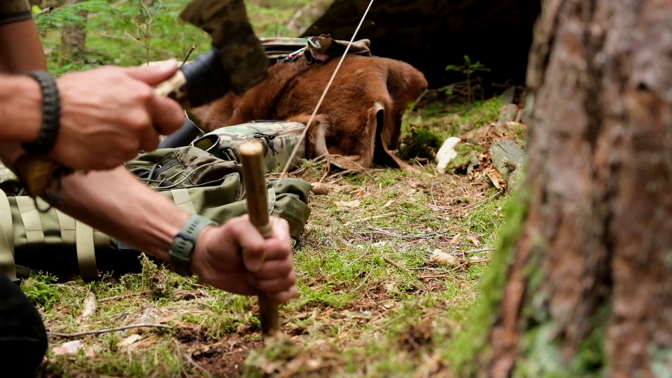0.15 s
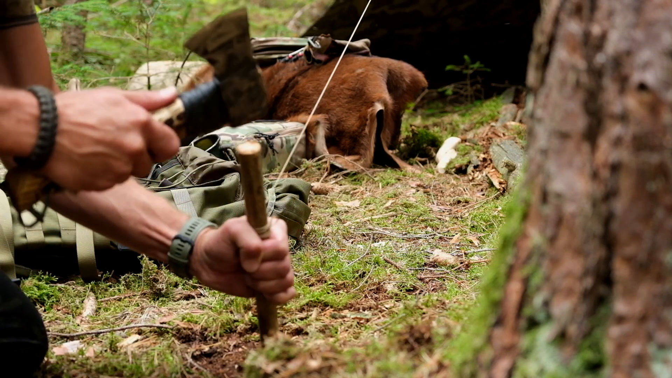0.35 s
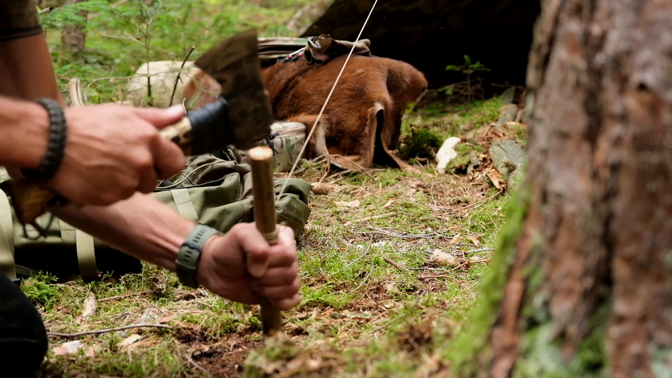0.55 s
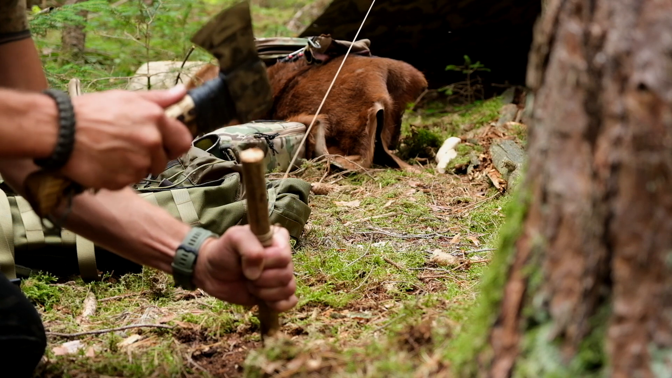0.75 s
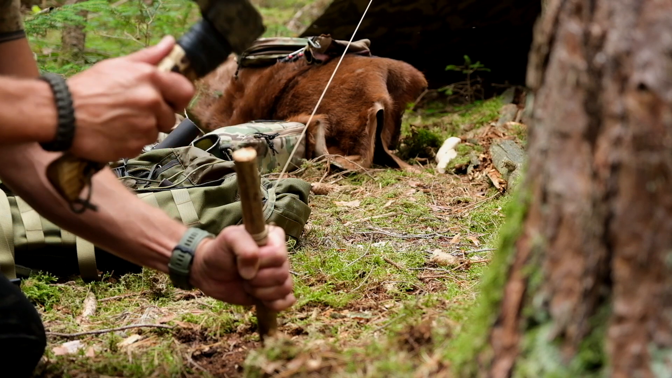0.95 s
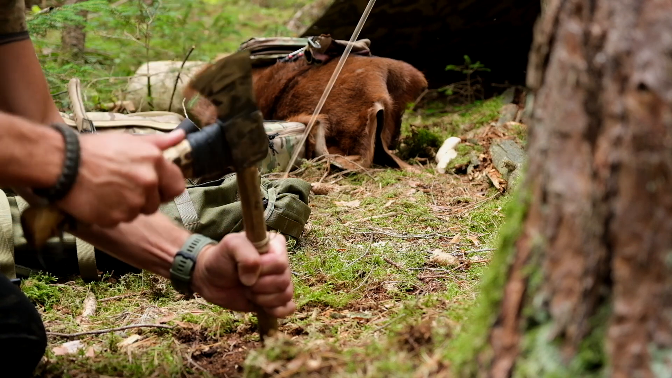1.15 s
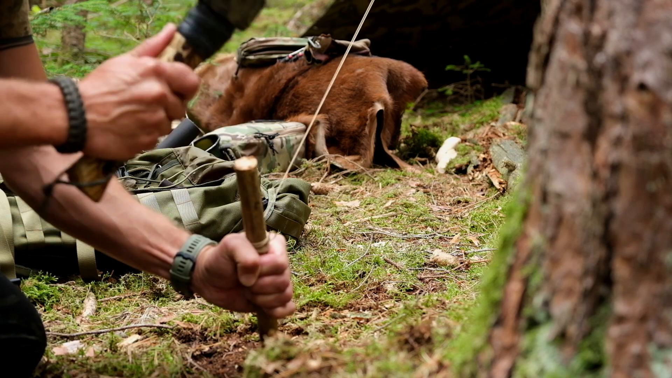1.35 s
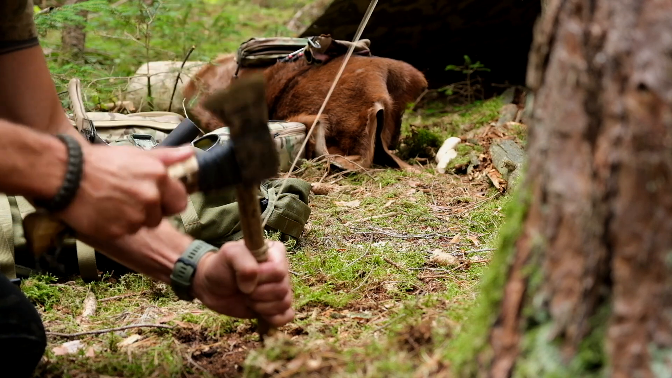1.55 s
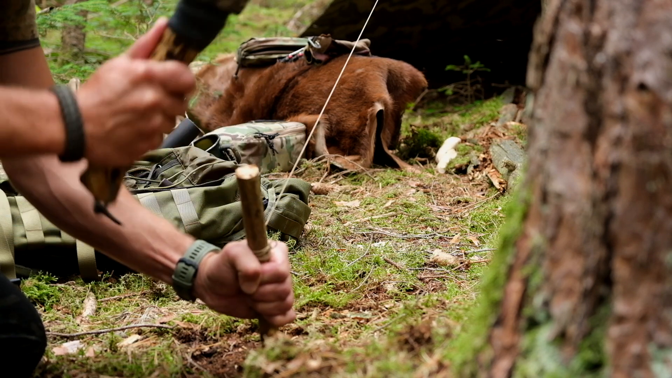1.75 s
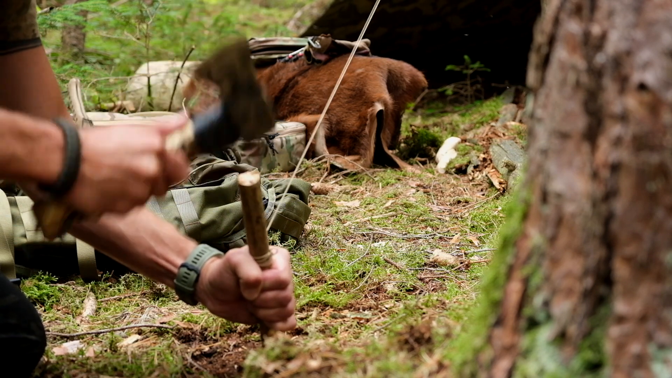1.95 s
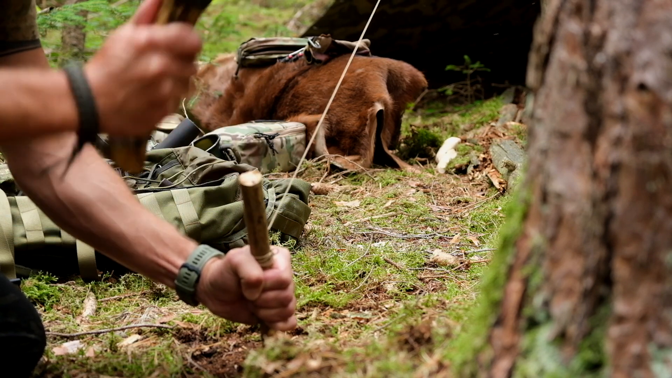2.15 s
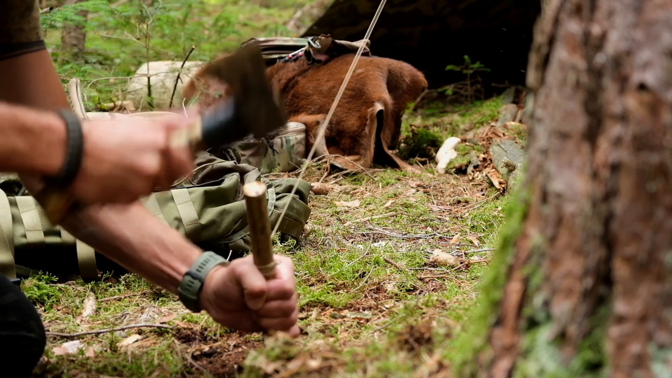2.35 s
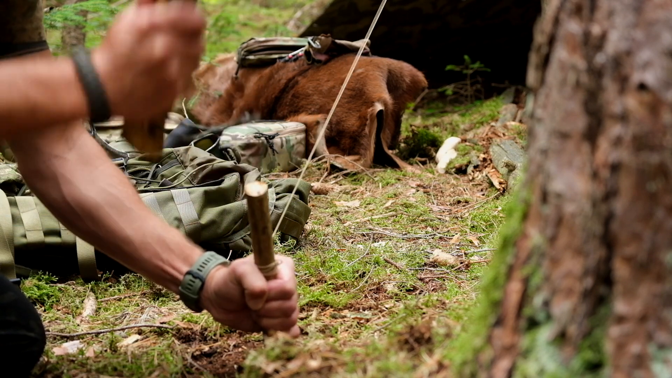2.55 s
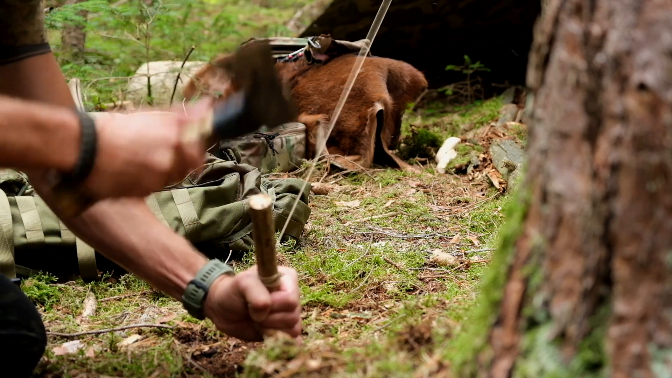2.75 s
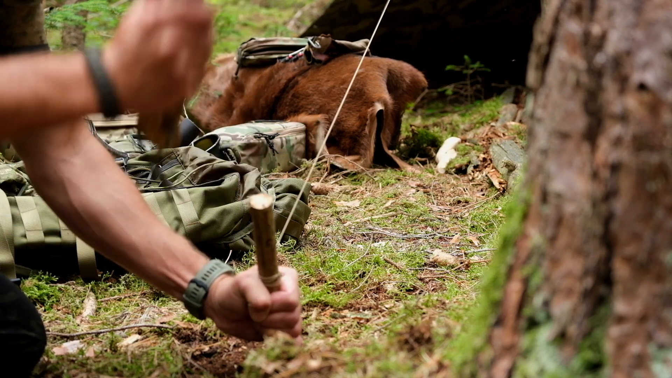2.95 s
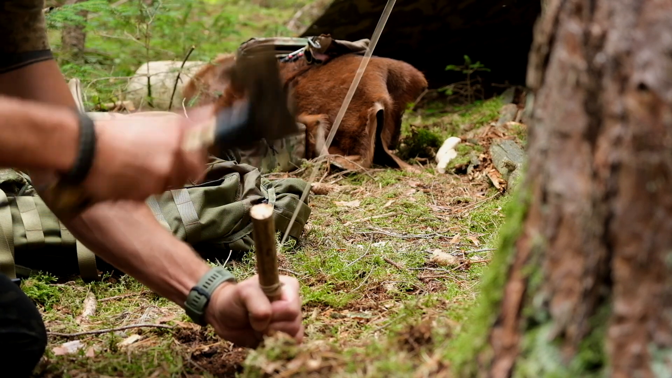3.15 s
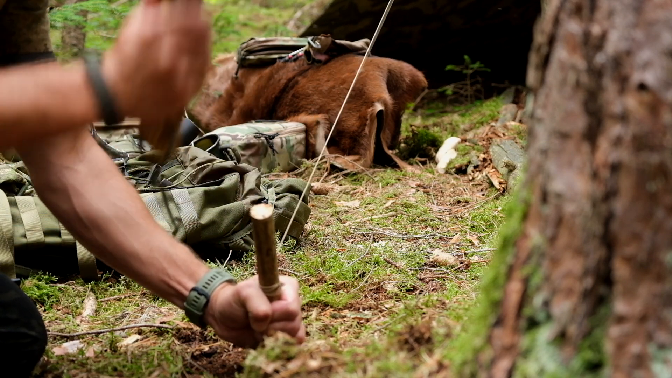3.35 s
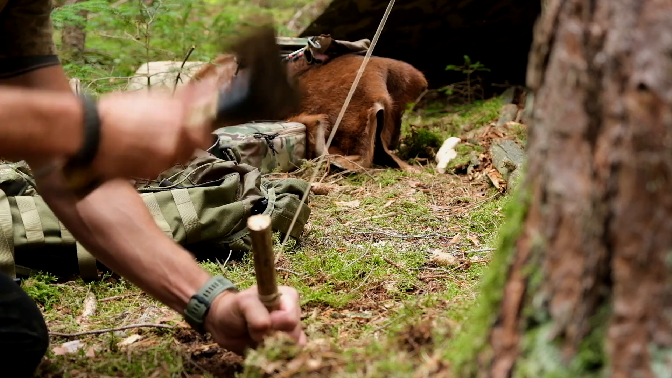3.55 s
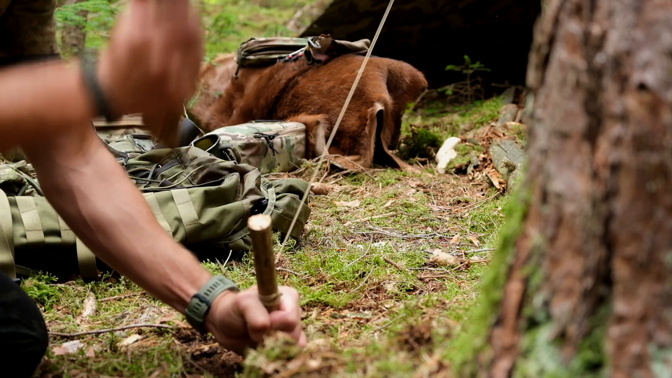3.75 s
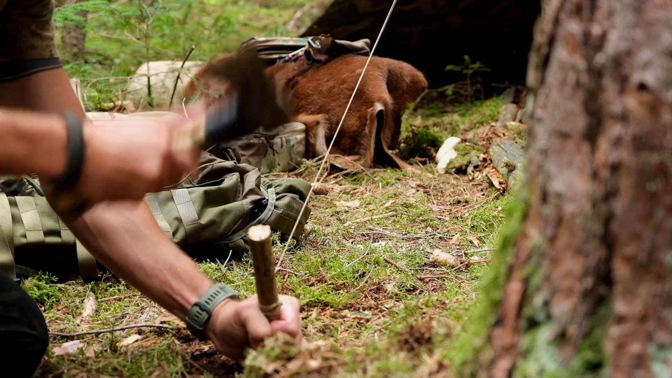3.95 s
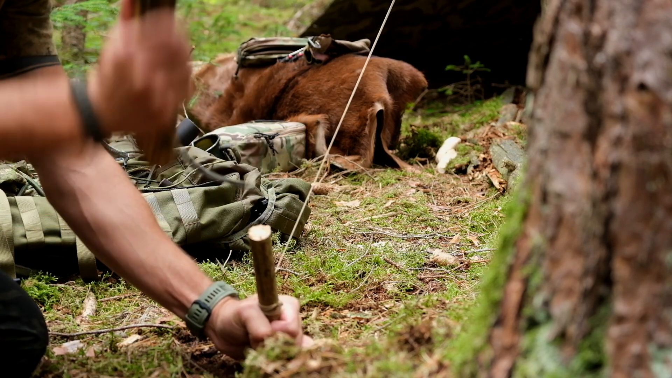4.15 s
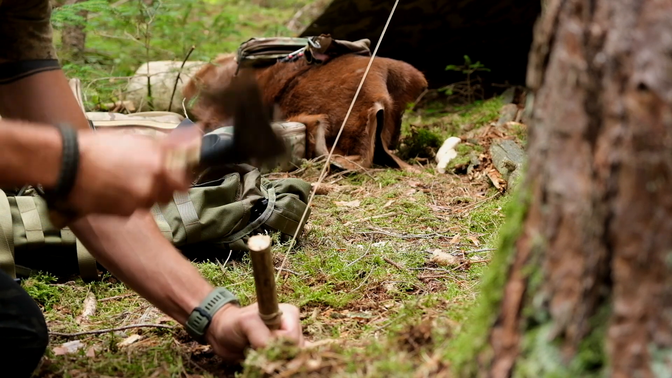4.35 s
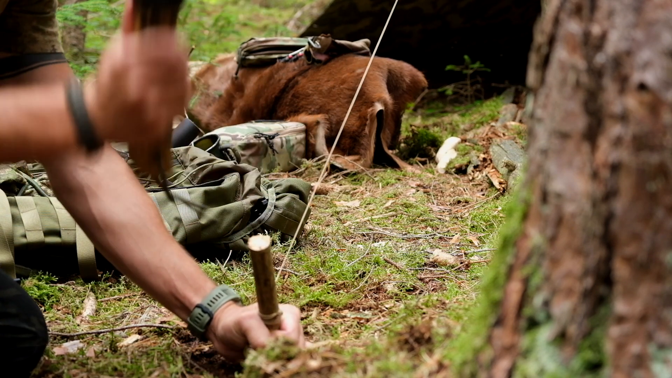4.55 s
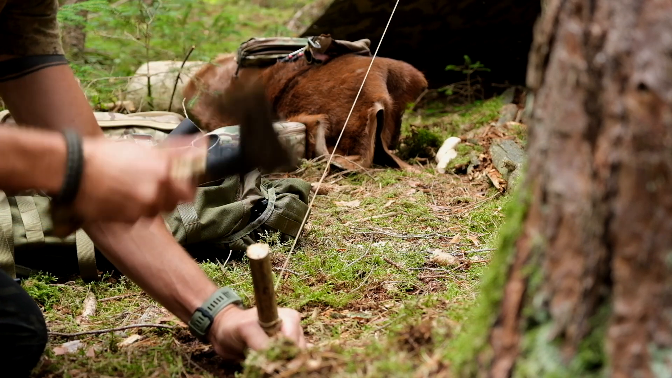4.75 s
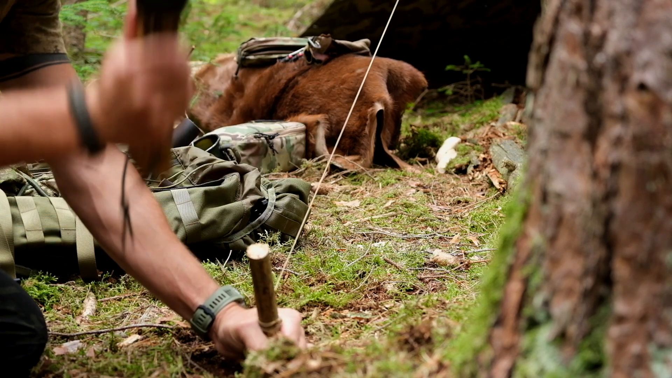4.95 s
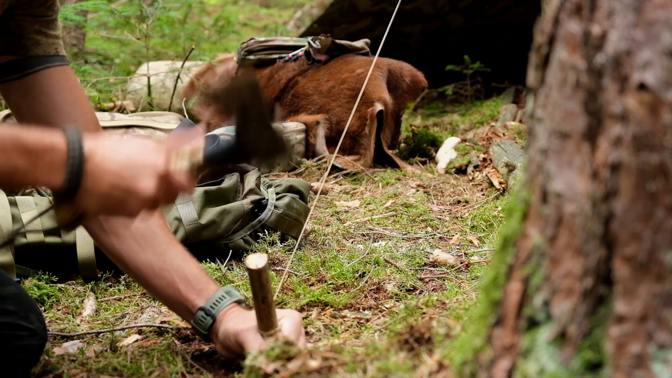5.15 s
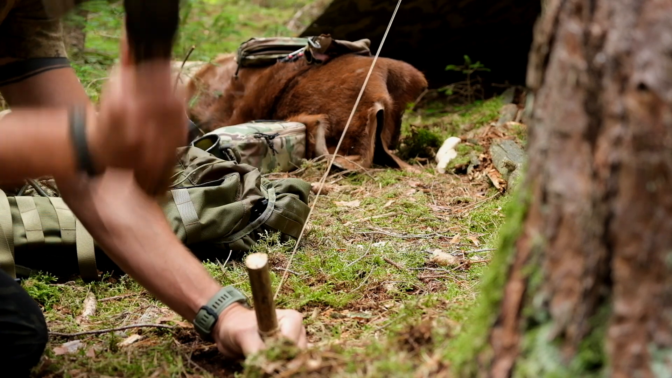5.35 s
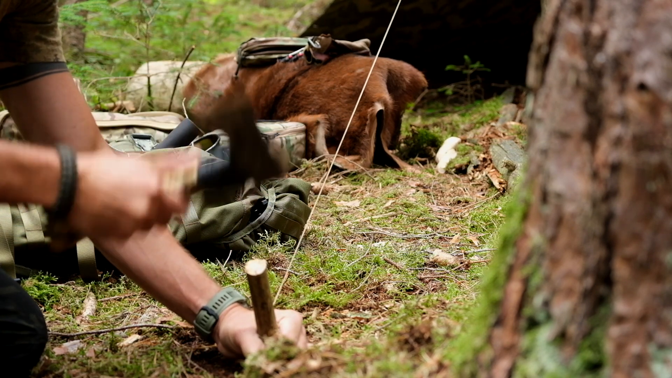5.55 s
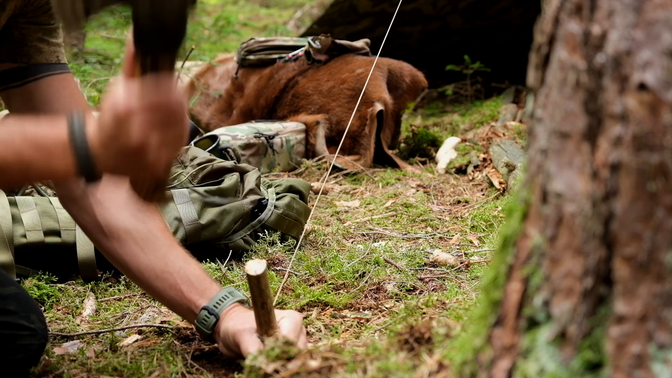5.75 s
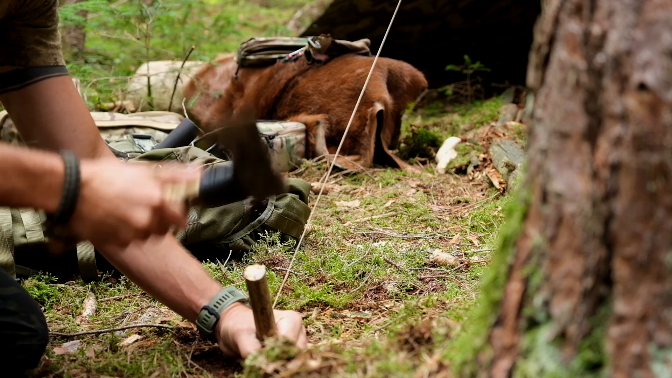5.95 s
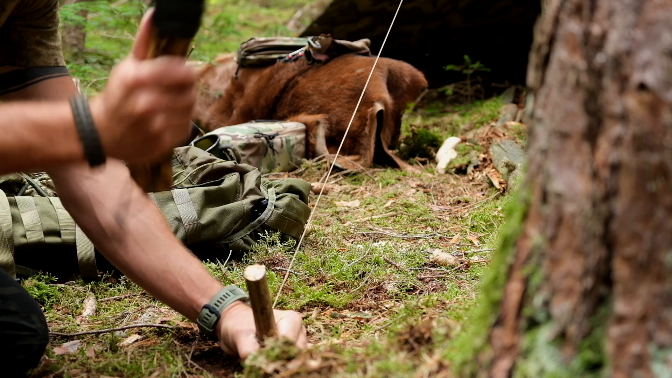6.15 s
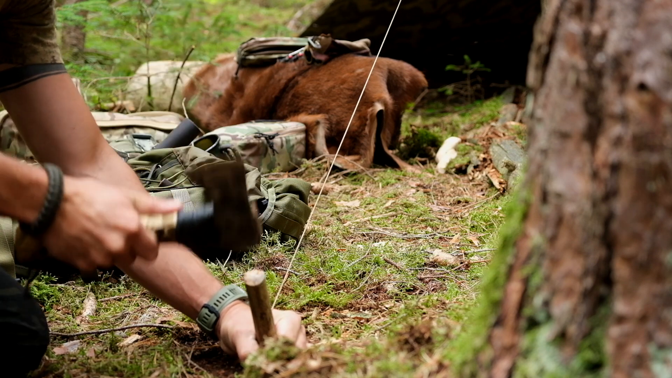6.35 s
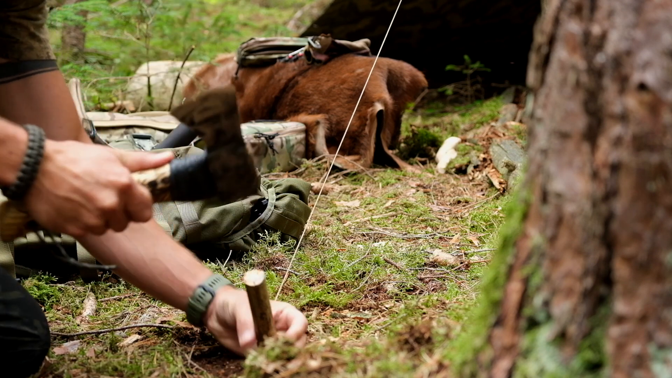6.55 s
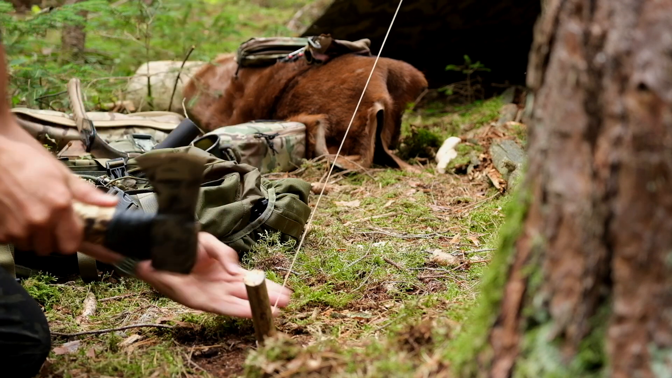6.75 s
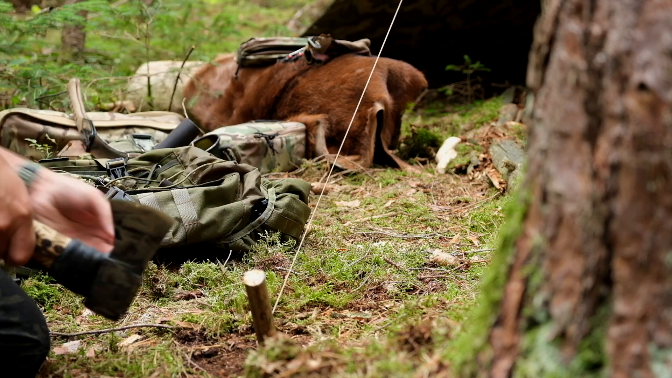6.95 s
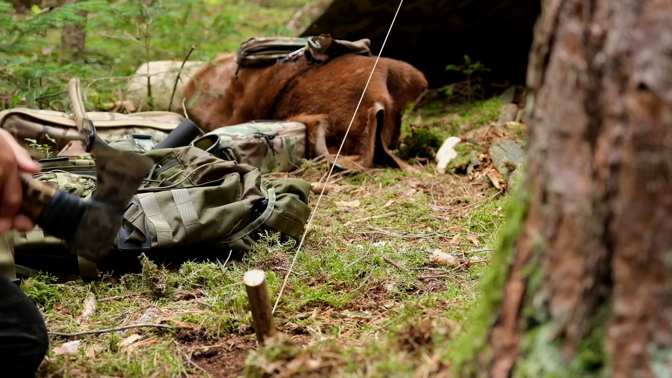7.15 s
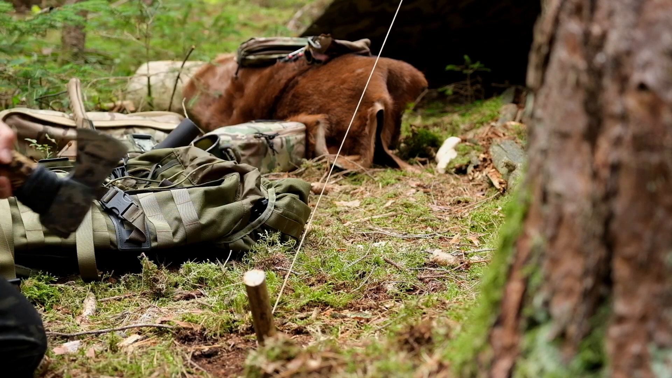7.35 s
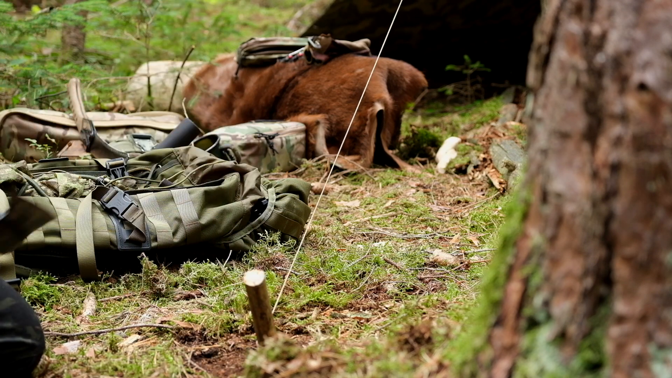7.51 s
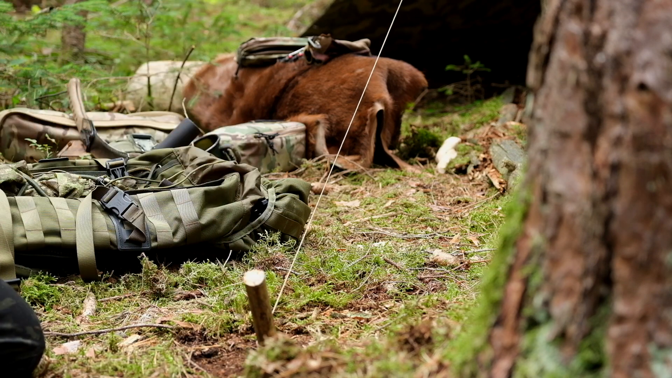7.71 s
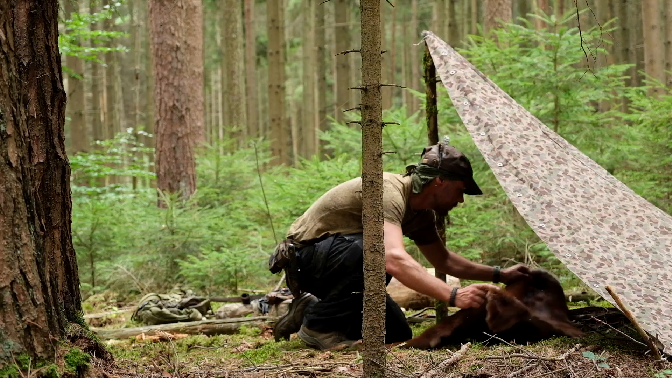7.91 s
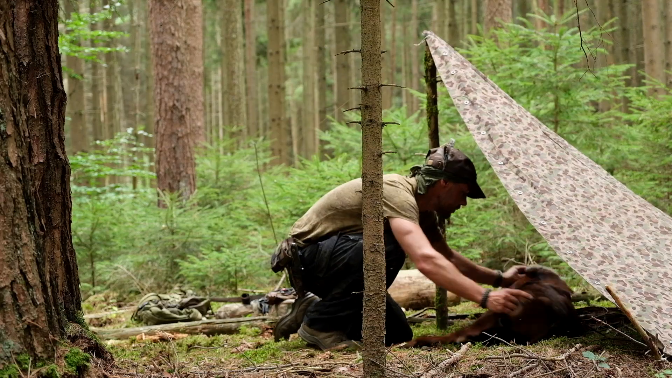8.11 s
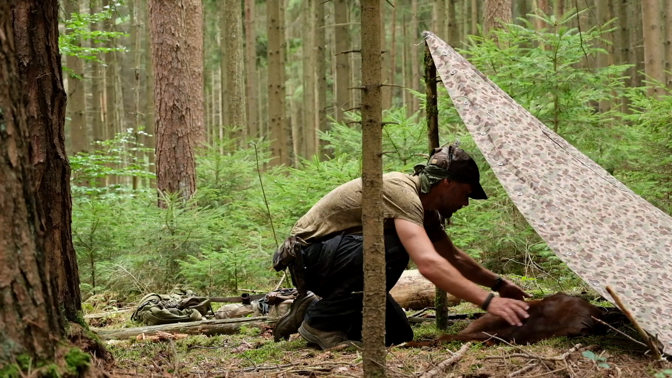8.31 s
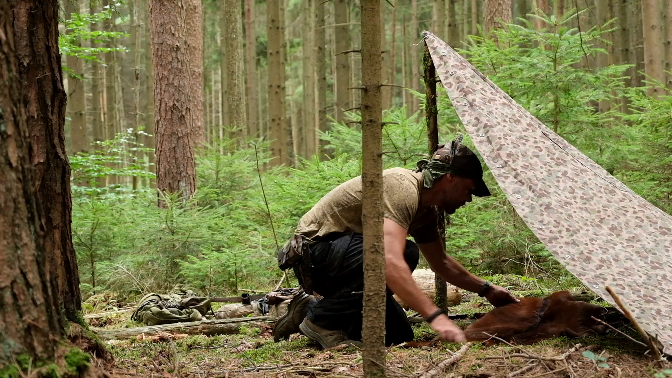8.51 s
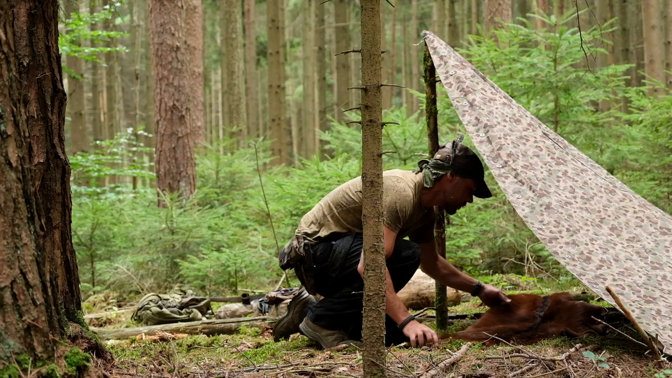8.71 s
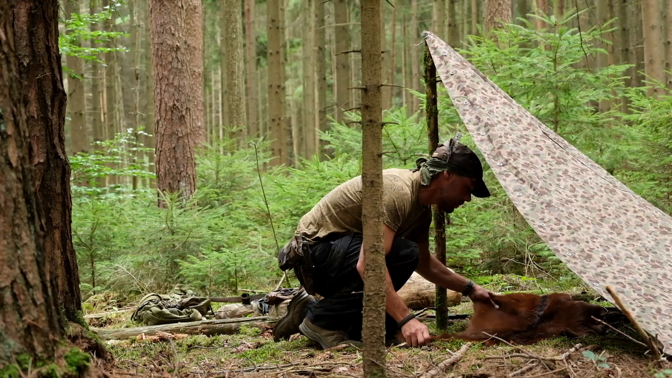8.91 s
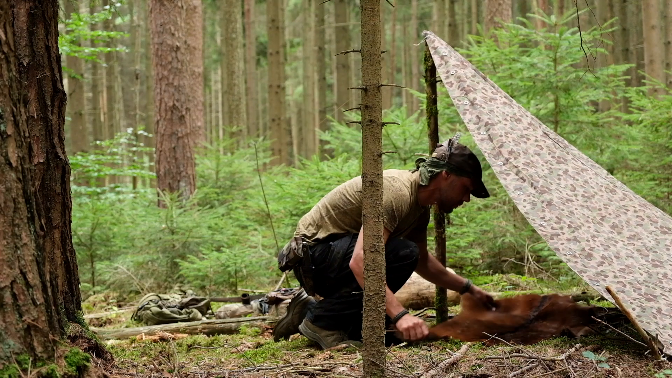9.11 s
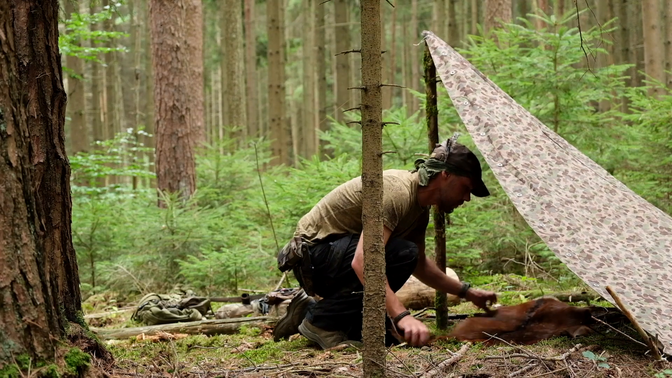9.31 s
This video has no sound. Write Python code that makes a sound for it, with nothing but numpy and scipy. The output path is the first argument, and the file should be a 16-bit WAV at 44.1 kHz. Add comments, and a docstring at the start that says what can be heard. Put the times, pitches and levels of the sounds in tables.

```python
"""In a wood, far birds sing over a faint hush, heard by a stereo microphone close to a wooden stake. From 1.2 s
the back of a hatchet drives the stake into the soil: the first blows find it loose and wobbling, the later ones
gripped. Each is a noise burst ringing stake and steel, with a soil thud that sinks in pitch; the sharp front of
each knock echoes off the trunks; the hard blows overload the input. After 6.4 s the hammering is over and
birds, rustles and low bumps remain; at 7.7 s a distant rush, a soft band of noise, sets in and stays to the
end."""
import sys
import numpy as np
from scipy import signal
from scipy.io import wavfile
from scipy.ndimage import uniform_filter1d

SR = 44100
rng = np.random.default_rng(int(sys.argv[2]) if len(sys.argv) > 2 else 0)


def waveform_to_disk(signal):
    """Save audio, clipped to [-1, 1], as 16-bit WAV at the path in sys.argv[1]."""
    frames = np.transpose(np.atleast_2d(signal))
    scaled = np.clip(frames, -1, 1) * 32767
    samples = np.round(scaled).astype(np.int16)
    wavfile.write(sys.argv[1], SR, samples)


N = 413658  # samples, about 9.4 s

# Hush of the wood, relative spectrum: pitch_hz, density_db (per Hz)
HUSH = [(15, -34), (25, 3), (70, 0), (123, -10.5), (223, -5.5), (394, -14.5), (451, -16.5), (1650, -21),
        (2480, -21), (4250, -13), (4870, -16.5), (8830, -24.5), (14800, -29.5), (16000, -37)]
# How alike the hush is left and right: pitch_hz, likeness (1 = same)
LIKENESS = [(60, 0.98), (180, 1), (550, 0.83), (1650, 0.65), (4970, 0.96), (15000, 0.09)]
# Far birds blurred together, level over time: time_s, level_db
CHORUS = [(0.0, -59.5), (1.38, -69.5), (1.77, -59), (2.04, -64.5), (4.18, -56.5), (4.39, -62.5),
          (6.4, -59.5), (7.5, -65), (7.86, -55), (8.18, -64.5), (9.38, -63)]
# Bird notes that stand out: start_s, length_s, start_hz, end_hz, level_db, bird
NOTES = [(0., .06, 5200, 5010, -53, "far high"), (0.149, 0.16, 2576, 2417, -56.5, "low"),
         (.219, .028, 5320, 5080, -52, "warbler"), (.234, 0.091, 4640, 3360, -50.5, "far warbler"),
         (0.28, 0.13, 3450, 2760, -50, "warbler"), (0.36, 0.03, 7680, 7900, -56.5, "far high"),
         (0.451, 0.065, 4560, 4830, -56, "warbler"), (0.748, 0.095, 5180, 4800, -55, "far warbler"),
         (0.928, 0.089, 4650, 4900, -54, "warbler"), (1.034, 0.032, 4770, 4580, -53.5, "warbler"),
         (1.765, 0.037, 5100, 5180, -52, "high"), (1.81, 0.029, 4770, 6700, -51.5, "far warbler"),
         (1.824, 0.05, 3840, 4560, -47.5, "warbler"), (1.848, 0.086, 3980, 2970, -56, "far warbler"),
         (2.516, 0.05, 6140, 5260, -56.5, "high"), (2.843, 0.046, 6840, 6270, -54.5, "high"),
         (2.863, .045, 4870, 5100, -54.5, "far high"), (2.922, 0.1, 5970, 4820, -57, "far high"),
         (4.038, 0.025, 4500, 5600, -44, "far warbler"), (4.043, 0.092, 4590, 3630, -48, "far warbler"),
         (4.241, .017, 6400, 5850, -56, "high"), (4.847, 0.063, 7660, 8050, -56, "high"),
         (4.956, 0.045, 5820, 6210, -44, "warbler"), (5.384, 0.083, 4270, 5220, -52, "far high"),
         (5.611, 0.033, 4160, 6200, -54.5, "high"), (5.643, .06, 2820, 3030, -52, "far warbler"),
         (5.785, .053, 5740, 5270, -50.5, "high"), (6.05, .086, 3300, 2750, -56, "low"),
         (6.224, 0.11, 2550, 2586, -62, "low"), (6.413, 0.066, 4570, 4480, -50.5, "far high"),
         (6.511, 0.02, 4400, 4170, -47.5, "warbler"), (6.522, 0.05, 3540, 3260, -50.5, "warbler"),
         (6.569, 0.049, 2810, 3255, -55.5, "warbler"), (7.069, .044, 6070, 6570, -56.5, "high"),
         (7.136, 0.074, 5170, 5330, -54, "high"), (7.2, .076, 5610, 5270, -52, "far high"),
         (7.275, .041, 2210, 1956, -61, "low"), (7.589, .067, 5000, 5000, -55, "far high"),
         (7.713, .1, 4800, 3620, -53.5, "far warbler"), (7.867, 0.097, 3600, 2960, -56, "far warbler"),
         (8.552, .06, 5120, 4660, -49.5, "far high"), (8.672, 0.031, 4170, 4310, -48.5, "warbler"),
         (8.698, 0.024, 3430, 3140, -44.5, "warbler"), (8.7, 0.041, 8100, 7670, -57, "far high"),
         (8.733, 0.045, 2890, 3300, -47.5, "warbler"), (8.919, 0.079, 6650, 5700, -49, "high"),
         (8.988, .07, 5400, 4590, -56.5, "high"), (9.126, .06, 6260, 5000, -60, "far high"),
         (9.18, .075, 4700, 4600, -56, "high"), (9.192, .095, 2510, 2420, -64.5, "low"),
         (9.299, 0.021, 4500, 5680, -49, "high"), (9.308, 0.023, 5650, 4780, -47.5, "high"),
         (9.312, 0.073, 3370, 2950, -61, "low")]
# Where each bird sits, by bird: blur_hz (from distance), left_right_db (positive = left)
PERCHES = {"low": (34, 6), "warbler": (110, -5), "far warbler": (410, -5.5), "high": (75, 7),
           "far high": (280, 12)}
# Small ticks and plops near by: start_s, peak_db, centre_hz
TICKS = [(0.049, -25, 6200), (.22, -42, 8000), (4.544, -47.5, 660), (5.029, -46, 1700), (5.442, -30, 4400),
         (6.523, -50, 673)]
# Low bumps: centre_s, level_db, direction (1 = push, -1 = pull)
BUMPS = [(8.017, -39, -1), (8.036, -35, 1), (8.115, -37.5, -1), (8.789, -38, 1)]
# Brief treble rustles: centre_s, spread_s, level_db
RUSTLES = [(6.6, 0.034, -56.5), (7.3, 0.055, -63)]
# Ringing of the wood around: pitch_hz, t60_s
WOOD_T60 = [(200, .12), (800, 0.12), (2000, 0.7), (4000, 0.44), (8000, 0.3), (14000, .1)]
# Scatter off what lies near: pitch_hz, t60_s
LITTER_T60 = [(1000, 0.026), (3000, 0.1), (8000, 0.14), (14000, 0.036)]
# Colour of both scatter tails: pitch_hz, level_db
ECHO_COLOUR = [(500, -32), (1300, -4.5), (2000, -5), (3200, -4), (5000, -3), (6500, -3.5), (8500, 1.5),
               (14000, -14)]
# Single echoes off trunks and the ground: delay_s, level_db
ECHOES = [(.0079, -24.5), (0.0163, -16), (0.0206, -27), (.024, -33), (0.034, -37), (.0505, -32.5),
          (.066, -41)]
# Blows of the hatchet: start_s, knock_peak_db (before overload), brightness_db (per octave), thud_db,
# thud_hz (nominal)
BLOWS = [(1.189, -0.5, 1, -33, 243), (1.544, 1.5, 0.5, -24.5, 190), (1.92, 7, -3, -17, 213),
         (2.314, 12, 1, -16.5, 258.9), (2.71, 11, 5, -13.5, 244), (3.108, 13, 1, -12.5, 264),
         (3.501, 11, 3, -12, 260), (3.899, 14, -0.5, -15, 252), (4.302, 14, -0.5, -15.5, 262),
         (4.704, 11.5, 2, -12.5, 261), (5.102, 9.5, 3, -13.5, 274.5), (5.496, 11, -1.5, -12.5, 198),
         (5.904, 11, 2.5, -11.5, 191), (6.323, 8.5, 5.5, -12, 191)]
# The head drops back on the stake after some blows: start_s, knock_peak_db, wobble_db (sideways), thud_db
REBOUNDS = [(2.7478, -20, 14, -20.5), (3.542, -31, 20, -19.5), (5.142, -13, 0, -18), (6.383, -28, 22, -25)]
# Stake modes along the grain, nominal: pitch_hz, level_db, t60_s
STAKE = [(2055, 6.5, 0.0087), (2684, 4, 0.0061), (3050, 3.5, 0.0014), (4277, 1, 0.0064),
         (5526, -9.5, 0.0023), (6980, -8, 0.0088), (11000, -20.5, .006), (13000, -14, .005)]
# Bending of the stake's free end, nominal: pitch_hz, level_db, t60_s
WOBBLE = [(473.6, -3.5, 0.017), (970, 0.5, 0.007), (1404, 1, 0.0065)]
# Modes of the hatchet head, nominal: pitch_hz, level_db, t60_s
STEEL = [(7320, -27, 0.054), (8070, -21, 0.036)]

HUSH_DB = -51
RUSH_START_S, RUSH_RISE_S, RUSH_DB = 7.69, 0.33, -60
# The loose stake bends sideways until the soil grips it
LOOSE_WOBBLE_DB, SETTLED_WOBBLE_DB = 19, -7.5
SETTLE_S, SETTLE_SPREAD_S = 1.8, 0.082
LOOSE_CONTACT_MS, CONTACT_MS = 0.64, 1.18
STAKE_PITCH = 1.014  # factor on the stake's mode pitches
REBOUND_TILT_DB, REBOUND_PITCH = -5.5, .86  # dB per octave, pitch factor
REBOUND_CONTACT_MS, REBOUND_THUD_HZ = 1.3, 305
EDGE_HZ = 16180  # upper band limit


def gain_of(db):
    """Decibels to gain."""
    return 10 ** (np.asarray(db) / 20)


def evened(x):
    """Scales to rms 1."""
    return x / np.sqrt(np.mean(x ** 2) + 1e-20)


def read(points, hz):
    """Reads a spectrum table on a log-frequency axis."""
    f, value = np.transpose(points)
    return np.interp(np.log(hz + 1), np.log(f + 1), value)


def add(mix, s, sound):
    """Adds a sound at time s."""
    part = mix[..., round(s * SR):][..., :sound.shape[-1]]
    part += sound[..., :part.shape[-1]]


def sides(db):
    """Left and right gains for a level difference."""
    return gain_of([[db / 2], [-db / 2]])


def band(x, lo_hz, hi_hz):
    """Gentle band-pass."""
    edges = [lo_hz, min(hi_hz, SR / 2.1)]
    return signal.sosfilt(signal.butter(2, edges, "band", fs=SR, output="sos"), x)


def level(curve):
    """Gain over time from rows of time_s, level_db."""
    return gain_of(np.interp(np.arange(N) / SR, *np.transpose(curve)))


def hush():
    """Air in the crowns and microphone hiss: shaped stereo noise drifting in faint patches."""
    frames, hz = N // 256 + 5, np.fft.rfftfreq(1024, 1 / SR)
    a, b, c, d, patches = rng.standard_normal((frames, 513, 5)).T
    patches = evened(uniform_filter1d(uniform_filter1d(patches, 12, 0), 14, 1))
    same = np.clip(read(LIKENESS, hz), -1, 1)[:, None]
    left = a + 1j * b
    right = same * left + np.sqrt(1 - same ** 2) * (c + 1j * d)
    colour_db = read(HUSH, np.minimum(hz, 14800))[:, None]
    z = np.array([left, right]) * gain_of(colour_db + 1.1 * patches)
    noise = signal.istft(z, nperseg=1024, noverlap=768)[1][:, :N]
    return gain_of(HUSH_DB) * evened(noise)


def rush():
    """A soft, distant band of noise that comes in late and stays."""
    noise = band(band(rng.standard_normal(N), 730, 1340), 700, 2200)
    rise = np.clip((np.arange(N) / SR - RUSH_START_S) / RUSH_RISE_S, 0, 1)
    return gain_of(RUSH_DB) * evened(noise) * rise


def tail(decays, start_s, likeness, grain_db):
    """Scatter from many surfaces: stereo noise that dies band by band, left energy 1."""
    a, b = rng.standard_normal((2, 2, SR // 2))
    noise = likeness * a[0] + np.sqrt(1 - likeness ** 2) * b
    hz, t, z = signal.stft(noise, SR, nperseg=128)
    decay_db = -60 * t / read(decays, hz)[:, None]
    z = z * gain_of(read(ECHO_COLOUR, hz)[:, None] + decay_db)
    out = signal.istft(z, SR, nperseg=128)[1]
    n = np.arange(out.shape[1])
    out = out * np.clip(n / (start_s * SR), 0, 1) ** 2
    # level grain: single strong reflectors
    grain = gain_of(grain_db * evened(uniform_filter1d(b[1], size=40)))
    out = out * grain[n % b.shape[1]]
    return out / np.linalg.norm(out[0])


def note(length, start_hz, end_hz, blur_hz):
    """A whistle gliding between two pitches; distance smears it into a narrow noise."""
    n = round(length * SR)
    r = np.exp(-np.pi * 1.7 * blur_hz / SR)
    smear = [1, 1j] @ rng.standard_normal((2, 9000))
    for _ in range(2):
        smear = signal.lfilter([1 - r], [1, -r], smear)
    smear = smear[-n:]  # the filters have settled here
    smear = smear / np.sqrt(np.mean(abs(smear) ** 2))
    smear = smear + 60 / blur_hz  # steady part: the less blur, the cleaner the tone
    turns = np.cumsum(np.linspace(start_hz, end_hz, n)) / SR
    whistle = (smear * np.exp(2j * np.pi * turns)).real
    return evened(whistle) * signal.windows.tukey(n, .6)


def birds():
    """Single notes stand out of a dense chorus of far ones; both ring on among the trunks."""
    near, far = np.zeros((2, 2, N))
    for s, length, start_hz, end_hz, db, bird in NOTES:
        blur_hz, side_db = PERCHES[bird]
        add(near, s, gain_of(db) * sides(side_db) * note(length, start_hz, end_hz, blur_hz))
    for when, high, glide, long, loud, side in rng.random((900, 6)):
        hz = 4600 + 1500 * (high + loud - 1) + 300 * glide
        whistle = note(0.025 + 0.088 * long, hz, hz * (1.1 - .3 * glide), 200)
        add(far, when * N / SR, gain_of(9 * loud) * sides(8. * (side - .5)) * whistle)
    song = near + evened(far) * level(CHORUS)
    ringing = signal.fftconvolve(song.mean(0)[None], tail(WOOD_T60, .012, .3, 2.), axes=1)[:, :N]
    return song + .45 * ringing


def small_sounds():
    """Ticks and plops are dying noise snaps, bumps are single low pulses, rustles swells of treble noise."""
    out, t = np.zeros(N), np.arange(1500) / SR
    for s, db, hz in TICKS:
        cycles = hz * t
        snap = band(rng.standard_normal(len(t)) * np.exp(-cycles / 8.2), hz * 0.44, hz * 1.4)
        add(out, s, gain_of(db) * snap / abs(snap).max())
    for s, db, sign in BUMPS:
        u = (t - .012) / 0.0023
        pulse = (1 - 0.29 * u ** 2) * np.exp(-u ** 2 / 2)
        add(out, s - .012, np.sign(sign) * gain_of(db) * pulse)
    fizz = evened(band(rng.standard_normal(N), 5876, 12900))
    for s, spread, db in RUSTLES:
        swell = np.exp(-((np.arange(N) / SR - s) / spread) ** 2 / 2)
        out += gain_of(db) * swell * fizz
    return out


def thud(db, hz):
    """The soil answers late, and its lowest waves come last, so the pitch sinks."""
    t = np.arange(6000) / SR
    u = t * hz / 1.75  # slower waves peak later
    turns = np.cumsum(hz * (.8 + .45 * np.exp(-u / 1.2))) / SR
    first = u ** 4 * np.exp(4 - 4 * u) * np.sin(2 * np.pi * (turns + .75))
    hum = 3.2 * np.sin(2 * np.pi * (140 * t + rng.random()))
    rumble = 10.0 * band(rng.standard_normal(len(t)), 100, 310)
    arrival = np.minimum(t / .017, 1) ** 3
    late = (hum + rumble) * arrival * gain_of(-60 * t / 0.093)
    return gain_of(db) * (first + 0.47 * late)


def ring(modes, t, pitch):
    """Dying sines; each blow lands a little elsewhere and drives them differently."""
    hz, db, t60 = np.transpose(modes)[:, :, None]
    db = db + 0.86 * rng.standard_normal(hz.shape)
    hz = hz * (1 + 0.03 * rng.standard_normal(hz.shape))
    return (gain_of(db - 60 * t / t60) * np.sin(2 * np.pi * hz * pitch * t)).sum(0)


def tilted(modes, tilt_db):
    """Brightens modes by tilt_db per octave about 2 kHz."""
    return [(hz, db + tilt_db * np.log2(hz / 2000), t60) for hz, db, t60 in modes]


def knock(db, wobble_db, tilt_db, pitch, contact_ms):
    """Steel crushes end grain for a millisecond or two; stake and head ring briefly."""
    t = np.arange(2500) / SR
    u = t * 1000 / contact_ms
    crush = rng.standard_normal(len(t)) * np.minimum(u / 0.11, 1) * np.exp(-u ** 1.2)
    crush[8] += 2.5  # the first touch
    bend = gain_of(wobble_db) * ring(WOBBLE, t, pitch)
    body = ring(tilted(STAKE, tilt_db), t, pitch) + ring(tilted(STEEL, tilt_db), t, 1)
    struck = band(signal.fftconvolve(crush, body)[:len(t)], 1300, SR / 2)
    sideways = np.linalg.norm(crush) * np.roll(bend, shift=8)  # starts at the first touch
    fibres = band(rng.standard_normal(len(t)), 1300, 4900) * np.minimum(u / 1.2, 1) * gain_of(-5. * u)
    sound = evened(struck + sideways) + gain_of(-9.0 + 2 * tilt_db) * evened(fibres)
    sound = band(sound, 500, SR / 2)  # a thin stake moves little air at low pitch
    front = (body + bend)[:60] * np.hanning(120)[60:]  # only the loud front carries far
    return gain_of(db) * sound / abs(sound).max(), gain_of(db) * front / abs(front).max()


def strokes():
    """Every touch of steel on wood: blows by how firmly the stake sits, then rebounds."""
    rows = []
    for s, db, tilt_db, thud_db, thud_hz in BLOWS:
        loose = 1 / (1 + np.exp((s - SETTLE_S) / SETTLE_SPREAD_S))  # 1 loose, 0 gripped
        wobble_db = SETTLED_WOBBLE_DB + (LOOSE_WOBBLE_DB - SETTLED_WOBBLE_DB) * loose
        contact_ms = CONTACT_MS + (LOOSE_CONTACT_MS - CONTACT_MS) * loose
        rows.append((s, (db, wobble_db, tilt_db, STAKE_PITCH, contact_ms), (thud_db, thud_hz)))
    for s, db, wobble_db, thud_db in REBOUNDS:
        touch = (db, wobble_db, REBOUND_TILT_DB, REBOUND_PITCH, REBOUND_CONTACT_MS)
        rows.append((s, touch, (thud_db, REBOUND_THUD_HZ)))
    return rows


def hammering():
    """Knocks and thuds close by, single echoes, and scatter from near litter and the far wood."""
    knocks, cracks, thuds = np.zeros((3, N))
    for s, touch, soil in strokes():
        sound, front = knock(*touch)
        add(knocks, s - .0003, sound)
        add(cracks, s, front)
        add(thuds, s, thud(*soil))
    echoes = np.zeros(N)
    thinned = band(band(cracks, 2100, 6000), 1500, 7100)  # trunks return little bass
    for delay, db in ECHOES:
        add(echoes, delay, gain_of(db) * thinned)
    far = gain_of(-33.0) * tail(WOOD_T60, .02, .85, 1.5)
    near = gain_of(-18.0) * tail(LITTER_T60, .005, 1.0, 4.)
    scattered = signal.fftconvolve(cracks[None], near + far, axes=1)[:, :N]
    return knocks + thuds + echoes + scattered


def scene():
    """Everything at the microphone, from the background to the stake."""
    return hush() + rush() + birds() + small_sounds() + hammering()


def record(dry):
    """The input overloads flat on the loud blows; then the band limit."""
    overloaded = np.clip(dry, -.95, .95)
    low_pass = signal.firwin(511, EDGE_HZ, window=("kaiser", 9), fs=SR)
    return signal.oaconvolve(overloaded, low_pass[None], "same")


dry = scene()
out = record(dry)
waveform_to_disk(out)
```